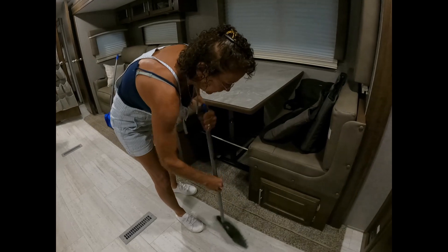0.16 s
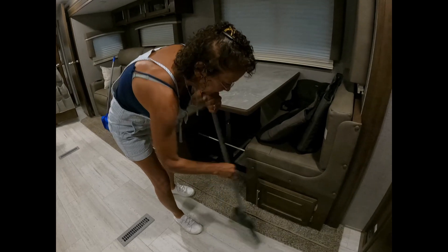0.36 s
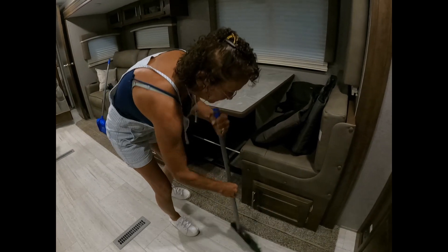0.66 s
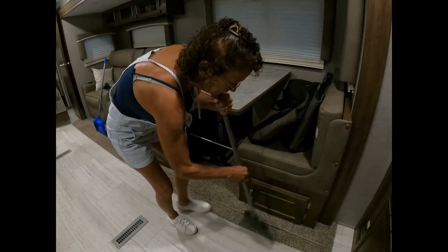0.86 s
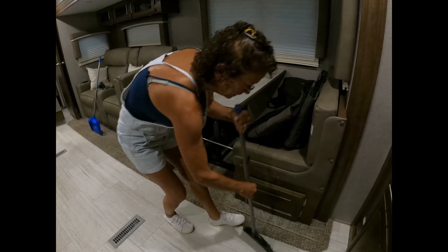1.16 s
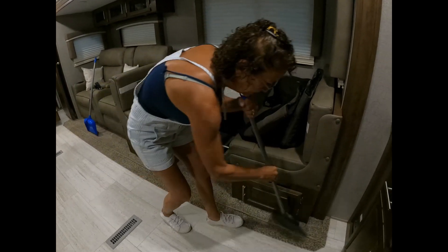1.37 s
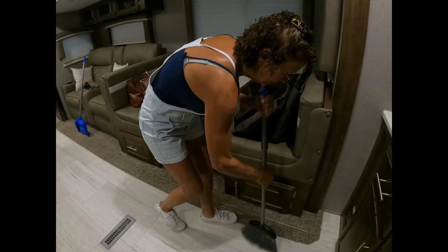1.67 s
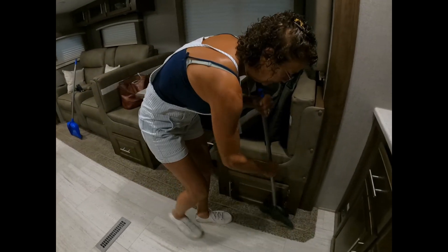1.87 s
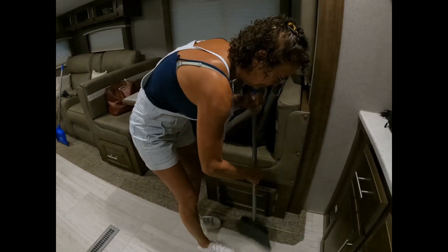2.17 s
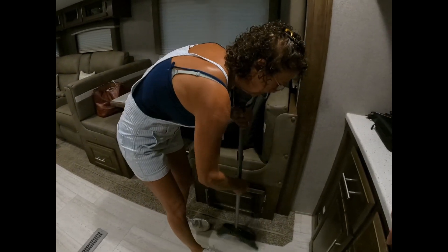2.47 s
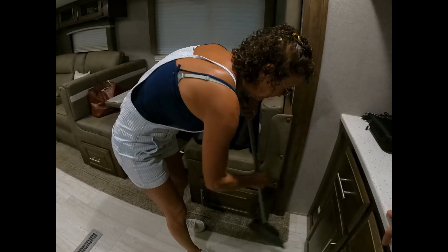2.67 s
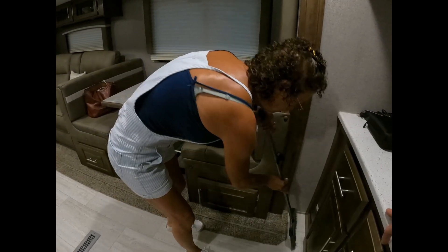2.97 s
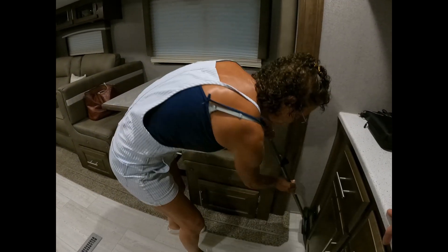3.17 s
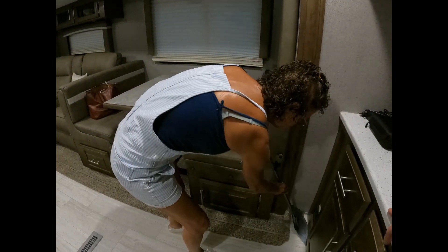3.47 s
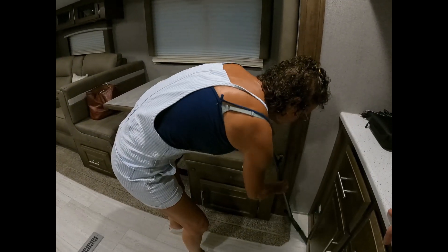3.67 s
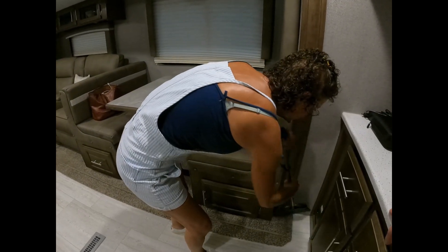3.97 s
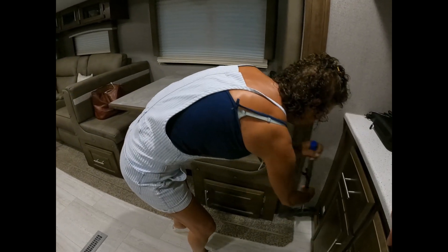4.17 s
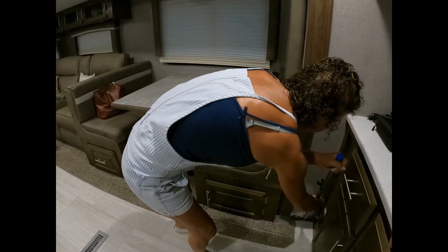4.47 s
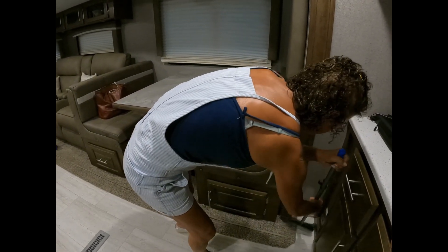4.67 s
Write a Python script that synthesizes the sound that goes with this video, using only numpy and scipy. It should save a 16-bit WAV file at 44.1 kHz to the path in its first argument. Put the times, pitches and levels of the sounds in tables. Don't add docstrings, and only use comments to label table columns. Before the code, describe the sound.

Dry bristles rasp across a rug on a hollow floor, regular at first, each stroke swelling and stopping quickly. A few panel bumps interrupt at two seconds, then lighter corner work follows: quick brushing, snapping tips, a heavy thump near 3.7 seconds, faint joint creaks. It finishes with a loud scratch and clattering knock on wood. Small dead interior, nearby camera microphone, faint air and deep rumble.

```python
import sys
import numpy as np
from scipy import signal
from scipy.fft import rfft, irfft
from scipy.io import wavfile
from scipy.ndimage import uniform_filter1d

SR = 44100
rng = np.random.default_rng(int(sys.argv[2]) if len(sys.argv) > 2 else 0)


def generate_wav(signal):
    frames = np.transpose(np.atleast_2d(signal))
    scaled = np.clip(frames, -1, 1) * 32767
    pcm = np.round(scaled).astype(np.int16)
    wavfile.write(sys.argv[1], SR, pcm)


def undo_db(level):
    steps = np.asarray(level, float) / 20
    return 10 ** steps


N = 213003

# (touch [s], time to full weight [s], time on to the lift [s], hiss [dB], weight [dB])
PULLS = [
    (0.152, 0.058, 0.14, -58, 0.5),
    (0.673, 0.09, 0.074, -57, 0),
    (1.169, 0.087, 0.066, -57.5, 1),
    (1.602, 0.12, 0.058, -57, 0),
    (2.049, 0.087, 0.071, -56.5, 1),
    (2.467, 0.1, 0.056, -58, 0.5),
]
# (at touch [dB], at full weight [dB], at lift [dB])
WEIGHT = [
    (-5, 1, -7),
    (-4.5, 2.5, -13.5),
    (-5, -1, -8),
]
# (touch [s], rise [s], hold [s], hiss [dB], scrape over hiss [dB])
DABS = [(.085, .015, .005, -74, -6), (0.57, .008, .047, -74, -14), (1.917, 0.0022, .008, -60.5, -13),
        (1.96, 0.069, 0.068, -68, 2.5), (2.4, 0.041, 0.0144, -78.5, -8), (2.93, 0.0164, 0.0074, -70, -1.5),
        (2.966, 0.058, .007, -66, 0), (3.128, 0.023, 0.061, -62.5, 1), (3.225, .03, 0.027, -63.5, 0),
        (3.27, 0.01, 0.0506, -63, 9), (3.32, 0.038, 0.055, -59.5, 5), (3.38, .055, 0.0286, -60, -0.5),
        (3.455, 0.013, 0.0176, -66, 3), (3.49, 0.013, 0.0057, -49, -10.5), (3.63, .035, 0.074, -65, -1.5),
        (4.06, 0.0177, .005, -68, -14), (4.103, 0.023, 0.13, -66, -12), (4.36, 0.072, 0.039, -65, 9.5),
        (4.47, 0.016, 0.018, -68, 5), (4.515, 0.0037, 0.054, -56, 7)]
# (touch [s], rise [s], hold [s], hiss [dB], scrape over hiss [dB])
DRAGS = [
    (1.078, .007, 0.027, -57.5, -5),
    (1.56, 0.028, .01, -80, 4.5),
    (1.925, .01, 0.0083, -68, -1.5),
    (3.53, 0.022, 0.084, -72, -21),
    (3.715, 0.025, 0.088, -63, -2.5),
    (3.87, 0.033, .01, -63.5, -2.5),
    (4.18, 0.12, 0.023, -62.5, 2.5),
    (4.55, 0.04, 0.03, -52, -2),
]
# (frequency [Hz], level [dB per Hz])
BRISTLE_TONE = [(1880, -38.5), (3200, 7), (3840, -1), (4450, 0), (8910, 0.5), (10800, -3.5), (14900, -5),
                (16000, -19)]
# (frequency [Hz], width [Hz], level [dB])
SCRAPE_PEAKS = [(1543, 460, -1.5), (2287, 860, 0.5), (2610, 500, 2), (3338, 738, -1)]
# (frequency [Hz], width [Hz], level [dB])
HEAD_PEAKS = [(539, 93, 3.5), (710, 173, -2), (843, 83, 6.5), (1044, 420, -1.5), (1337, 280, -6)]
# (frequency [Hz], width [Hz], level [dB])
BOARD_PEAKS = [(70, 12, -23), (147.2, 48, 1.5), (268, 65, 0), (330, 146, -4.5)]
# (time [s], peak [dB], ring [Hz], treble over peak [dB])
TICKS = [(1.9196, -46, 3200, -17), (2.037, -53, 3200, -16), (3.281, -49.5, 2200, -14),
         (3.288, -35, 2410, -15), (3.295, -44, 2420, -18), (3.36, -53, 3000, -10),
         (3.373, -41.5, 1480, -14), (3.411, -39, 1720, -10), (3.5734, -45.5, 5240, -8.5),
         (3.664, -54, 5400, -5), (3.738, -48, 2300, -11.5), (4.458, -41.5, 4540, 2),
         (4.514, -46, 4550, -12.5), (4.519, -32, 2507, -12.5), (4.529, -33.5, 2460, -12.5),
         (4.537, -34, 2280, -2), (4.541, -32, 1700, -5), (4.555, -34, 1600, -13), (4.567, -59, 3500, -6),
         (4.58, -39, 4530, -9.5), (4.594, -37, 1700, -10), (4.618, -45, 2600, -20)]
# (time [s], peak [dB], ring [Hz], treble over peak [dB])
SLAPS = [
    (0.583, -51, 1030, -19),
    (1.084, -44.5, 897, -12),
    (1.508, -52.5, 874, -12),
    (2.939, -58, 6100, -14),
    (3.018, -61, 1760, -25),
    (3.131, -49, 740, -29),
    (3.219, -47.5, 1430, -28.5),
    (3.522, -45, 5930, -7),
    (4.619, -42, 1320, -38),
    (4.628, -42, 704, -38),
]
# (time [s], level [dB], panel [Hz], time to fade 60 dB [s], rattle [s])
THUDS = [(0.001, -49, 420, 0.01, .006), (1.508, -55, 900, 0.013, 0.034), (2.037, -46, 712, 0.023, .006),
         (2.043, -43.5, 497, 0.045, 0.0088), (2.057, -43, 411.5, 0.0695, 0.0123),
         (2.419, -55.5, 450, 0.047, .01), (2.448, -53.5, 338, 0.025, 0.034),
         (2.612, -53, 202, 0.09, 0.0105), (3.281, -49, 330, 0.085, 0.0115), (3.37, -45, 313, 0.052, 0.016),
         (3.498, -58, 363, 0.096, 0.037), (3.738, -40.5, 467, 0.043, 0.0055),
         (3.744, -43, 407, 0.15, 0.0154), (3.765, -47, 330, 0.074, .03),
         (3.752, -47.5, 237.5, 0.185, 0.025), (4.316, -55, 284, 0.097, 0.022),
         (4.535, -48.5, 372.6, 0.042, 0.028), (4.622, -45.5, 265, 0.14, .03),
         (4.641, -50, 760, 0.019, 0.0174)]
# (frequency [Hz], level [dB], time to fade 60 dB [s])
CABINET_MODES = [(249, -0.5, 0.06), (407, -6, 0.05), (564, -1.5, 0.04), (783, -3, 0.032), (1020, -4, 0.025),
                 (1285, 2.5, .028), (1600, 2, .022), (1990, -7, .03), (2570, -4, 0.023), (3100, -11, .015)]
# (time [s], level [dB])
KNOCK = [
    (4.617, -36.5),
    (4.621, -35.5),
    (4.627, -40.5),
    (4.641, -45),
    (4.659, -49),
]
# (time [s], length [s], level [dB], joint [Hz], width [Hz])
CREAKS = [
    (3.432, .065, -66, 2960, 110),
    (3.499, 0.019, -52.5, 3100, 303),
    (3.519, 0.075, -77, 3090, 120),
    (3.893, .035, -68, 3370, 400),
    (3.897, 0.034, -62.5, 1760, 700),
    (4.097, .035, -67, 2950, 149),
    (4.1, .022, -69, 3300, 250),
    (4.126, .1, -72, 2930, 90),
]
# (time [s], length [s], level [dB], joint [Hz], width [Hz])
SQUEAKS = [
    (0.572, 0.082, -78, 3130, 300),
    (.585, .065, -76, 13900, 350),
    (.585, .05, -81, 12600, 300),
    (2.431, 0.036, -76, 4770, 151),
]
# (time [s], level [dB], floor tone [Hz], swell [s])
BOOMS = [(0.198, -64, 150, 0.059), (0.251, -63.5, 277, 0.042), (0.742, -58.5, 152.6, 0.16),
         (0.748, -57.5, 299, 0.044), (1.098, -53.5, 67.5, 0.16), (1.111, -62.5, 601, 0.048),
         (1.209, -63, 156, 0.058), (1.261, -57, 165, 0.046), (1.679, -58.5, 276, 0.09),
         (1.78, -62.5, 67, 0.095), (2.04, -60, 140, 0.043), (2.092, -55, 70, 0.087),
         (2.17, -59, 148.4, 0.082), (2.42, -62.5, 163, 0.045), (2.599, -52.5, 70, 0.095),
         (3.278, -58.5, 100.2, 0.11), (3.739, -43, 90.6, 0.052), (3.744, -51.5, 150.6, 0.097),
         (4.32, -61.5, 89, 0.091), (4.625, -49, 152.3, 0.077), (4.631, -47.5, 90.5, 0.088),
         (4.72, -58.5, 122, 0.063)]
# (time [s], level [dB])
SWAY = [(0.0, -37.5), (0.2, -38), (0.43, -49), (0.69, -39), (0.91, -36.5), (1.2, -45), (1.41, -31),
        (1.6, -39), (2.69, -36.5), (2.8, -30.5), (3.05, -42.5), (3.17, -32), (3.31, -33), (3.63, -45.5),
        (3.99, -38.5), (4.21, -46), (4.83, -48)]
# (frequency [Hz], level [dB per Hz])
QUIET_TONE = [(34, -33.5), (58, -2.5), (70, -5), (171, -18), (363, -18), (470, -22), (638, -22),
              (1200, -25.5), (8890, -32), (14900, -37), (16000, -41)]

TOUCH_DB, BITE_S, BITE_DB = -15.5, 0.039, -0.5
FLICK_DB, FLICK_S, LIFT_DB_PER_S = 2, 0.042, 288
DAB_RISE_DB, DAB_SAG_DB_PER_S = -13, 30.5
DAB_LIFT_DB_PER_S, DRAG_LIFT_DB_PER_S = 432, 154
DAB_HEAD_DB, DAB_BOARDS_DB, HEAD_PER_SCRAPE = -5, -8.5, .7
SETTLE_DB, SETTLE_DB_PER_S = -10.5, 125
LARGEST_SLIP_DB = 11
SQUEAK_RATE_HZ, CREAK_RATE_HZ = 540, 250
ROCK_HZ, ROCK_WIDTH_HZ = 7.2, 2.66
STEPPING_DB, STANDING_DB, FEET_STOP_S = -57.5, -62.5, 3
QUIET_DB = -66.5
ROOM_T60_S, ROOM_DB, ROOM_TOP_HZ = 0.23, -12, 4160
TOP_HZ = 15700


def broom():
    catch_db = 0.59 * walk(29.9)
    tips = slips(.5, 1.87)
    hiss = unit(colour(tips, BRISTLE_TONE)) * undo_db(0.73 * walk(90))
    scrape = unit(body(tips + slips(.1, 4.3), SCRAPE_PEAKS)) * undo_db(-1.03 + 2.7 * walk(40))
    head = unit(body(tips + slips(0.026, 4.2), HEAD_PEAKS)) * undo_db(-1.93 + 2.7 * walk(25.44))
    boards = unit(body(slips(0.018, 2.4), BOARD_PEAKS)) * undo_db(-3.5 + 1.06 * walk(12))
    return undo_db(catch_db) * np.sum(strokes() * [hiss, scrape, head, boards], axis=0)


def slips(share, spread_db):
    when, size, sign = rng.random(N), rng.exponential(size=N), rng.standard_normal(N)
    return (when < share) * undo_db(np.minimum(spread_db * size, LARGEST_SLIP_DB)) * sign


def strokes():
    t = np.arange(N) / SR
    power = np.zeros((4, N))
    for touch, lean, ease, db, weight_db in PULLS:
        heavy = touch + lean
        lift = heavy + ease
        times = [touch - .03, touch, touch + BITE_S, heavy, lift - FLICK_S, lift]
        dbs = db + np.array([2 * TOUCH_DB, TOUCH_DB, BITE_DB, 0, 0, FLICK_DB])
        hiss = contact(times, dbs, LIFT_DB_PER_S)
        lower_db = [weight_db + np.interp(t, [touch, heavy, lift], row) for row in WEIGHT]
        power += (hiss * undo_db(np.array([0 * t, *lower_db]))) ** 2
    for table, lift_db_per_s in (DABS, DAB_LIFT_DB_PER_S), (DRAGS, DRAG_LIFT_DB_PER_S):
        for touch, rise, hold, db, scrape_db in table:
            dbs = db + np.array([DAB_RISE_DB, 0, -DAB_SAG_DB_PER_S * hold])
            hiss = contact(touch + np.cumsum([0, rise, hold]), dbs, lift_db_per_s)
            shake_db = HEAD_PER_SCRAPE * scrape_db
            layers_db = np.array([0, scrape_db, shake_db + DAB_HEAD_DB, shake_db + DAB_BOARDS_DB])
            power += np.outer(undo_db(layers_db), hiss) ** 2
    return np.sqrt(power)


def contact(times, dbs, lift_db_per_s):
    t = np.arange(N) / SR
    after = np.maximum(t - times[-1], 0)
    held = undo_db(np.interp(t, times, dbs, left=-200))
    lifting = undo_db(-lift_db_per_s * after)
    settling = undo_db(SETTLE_DB - SETTLE_DB_PER_S * after)
    return held * np.maximum(lifting, settling)


def snaps(table, t60, gain_db, treble_db):
    out = np.zeros(N)
    for s, db, hz, top_db in table:
        t, env = fade(t60, length=.12)
        burst = rng.standard_normal(len(t)) * env * (1 - np.exp(-t / (0.02 * t60)))
        ring = 1.12 * steep(burst, hz, hz / 3) + 0.35 * steep(burst, 3170, 3700)
        top = signal.lfilter(*signal.butter(2, 6000, "high", fs=SR), burst)
        snap = ring / np.abs(ring).max() + undo_db(top_db + treble_db) * top / np.abs(top).max()
        add(out, s, undo_db(db + gain_db) * snap)
    return out


def thuds():
    out = np.zeros(N)
    for s, db, hz, t60, rattle in THUDS:
        t, env = fade(3 * rattle)
        first_blow = 2.3 * np.exp(-t / 0.00047)
        push = rng.standard_normal(len(t)) * env + first_blow
        panel = steep(push, hz, 4.3 / t60)
        panel = panel + 0.17 * steep(push, 1.35 * hz, 8 / t60) + 0.28 * steep(push, 0.73 * hz, 6 / t60)
        add(out, s, undo_db(db + 1) * panel / np.abs(panel).max())
    return out


def knock():
    out = np.zeros(N)
    for k, (s, db) in enumerate(KNOCK):
        for hz, mode_db, t60 in CABINET_MODES:
            t, env = fade(t60)
            turn, detune = rng.random(2)
            ring = np.sin(2 * np.pi * (hz * (.93 + 0.17 * detune) * t + turn))
            onset = 1 - np.exp(-t / 0.00049)
            add(out, s, undo_db(db + mode_db - 2.7 * k * hz / 1000) * env * onset * ring)
    return out


def creaks(table, rate):
    out = np.zeros(N)
    for s, length, db, hz, width in table:
        n = int(length * SR)
        phase = np.cumsum(rate / SR * (1 + 0.027 * walk(300)[:n]))
        pulses = np.diff(np.floor(phase), prepend=0) * undo_db(1.4 * rng.standard_normal(n))
        shape = signal.windows.tukey(n, .25) * undo_db(-6 * np.arange(n) / n)
        ring = unit(resonate(resonate(pulses, hz, width), hz, 2 * width))
        add(out, s, undo_db(db + 2.5) * shape * ring)
    return out


def booms():
    out = np.zeros(N)
    for s, db, hz, swell in BOOMS:
        t = np.arange(int(.4 * SR)) / SR
        u = 4.5 * t / swell
        wobble = 0.94 * np.cumsum(rng.standard_normal(len(t))) / np.sqrt(len(t))
        add(out, s, undo_db(db + 10) * u * np.exp(-u) * np.sin(2 * np.pi * (hz * t + wobble)))
    return out


def sway():
    t = np.arange(N) / SR
    rock_db = np.interp(t, *np.transpose(SWAY))
    rumble_db = np.interp(t, [FEET_STOP_S, FEET_STOP_S + 0.26], [STEPPING_DB, STANDING_DB]) + 1.1 * walk(4)
    rock = resonate(resonate(rng.standard_normal(N), ROCK_HZ, ROCK_WIDTH_HZ), ROCK_HZ, 5.5)
    swing = uniform_filter1d(np.abs(signal.hilbert(rock)), size=6000)
    rock = rock / (swing + 0.12 * np.std(rock))
    rumble_tone = [(12, -26), (17, 0.5), (30, 9.5), (36, -20), (50, -26.5), (80, -52.0)]  # (Hz, dB)
    rumble = colour(rng.standard_normal(N), rumble_tone)
    return undo_db(rock_db) * unit(rock) + undo_db(rumble_db) * unit(rumble)


def quiet():
    return undo_db(QUIET_DB + 1.2 * walk(4.2)) * unit(colour(rng.standard_normal(N), QUIET_TONE))


def room(x):
    t, env = fade(ROOM_T60_S)
    tail = rng.standard_normal(len(t)) * env * (t > .003)
    tail = signal.lfilter(*signal.butter(1, ROOM_TOP_HZ, fs=SR), tail)
    return x + undo_db(ROOM_DB) * signal.fftconvolve(x, tail / np.linalg.norm(tail))[:N]


def unit(x):
    return x / np.sqrt(np.mean(x ** 2))


def colour(x, points):
    hz, db = np.transpose(points)
    f = np.maximum(np.fft.rfftfreq(len(x), 1 / SR), 1)
    return irfft(rfft(x) * undo_db(np.interp(np.log(f), np.log(hz), db)), len(x))


def resonate(x, hz, width):
    return signal.lfilter(*signal.iirpeak(min(hz, SR / 2.2), hz / width, fs=SR), x)


def steep(x, hz, width):
    return resonate(resonate(x, hz, width), hz, 3 * width)


def body(x, peaks):
    return sum((-1) ** k * undo_db(db) * steep(x, hz, w) for k, (hz, w, db) in enumerate(peaks))


def walk(rate):
    k = int(SR / rate)
    held = np.repeat(rng.standard_normal(N // k + 1), k)
    return 1.3 * uniform_filter1d(uniform_filter1d(held, k), k)[:N]


def fade(t60, length=.4):
    t = np.arange(int(length * SR)) / SR
    return t, undo_db(-60 * t / t60)


def add(out, s, x):
    i = int(s * SR)
    out[i:i + len(x)] += x[:len(out) - i]


def scene():
    ticks = snaps(TICKS, 0.0074, gain_db=-0.5, treble_db=-1.0)
    slaps = snaps(SLAPS, 0.061, gain_db=-5.0, treble_db=16.0)
    joints = creaks(SQUEAKS, SQUEAK_RATE_HZ) + creaks(CREAKS, CREAK_RATE_HZ)
    near = room(ticks + slaps + thuds() + knock() + joints)
    return (broom() + near + booms() + sway() + quiet())[None]


def roll_off(x):
    return signal.sosfilt(signal.butter(12, 16370, fs=SR, output="sos"), x)


def record(dry):
    wall = signal.ellip(10, .2, 70, TOP_HZ, fs=SR, output="sos")
    mix = signal.sosfilt(wall, dry)
    return roll_off(mix)


dry = scene()
out = record(dry)
generate_wav(out)
```